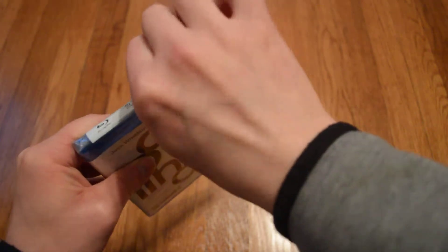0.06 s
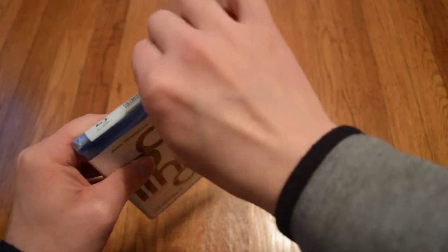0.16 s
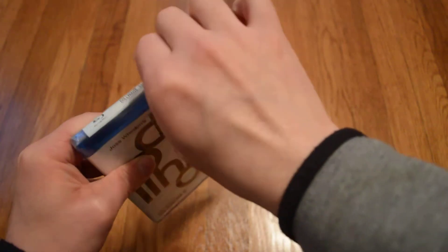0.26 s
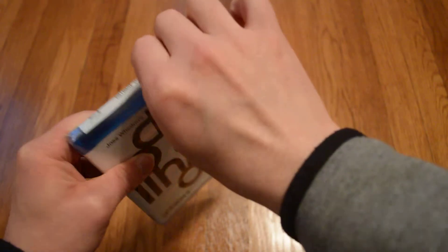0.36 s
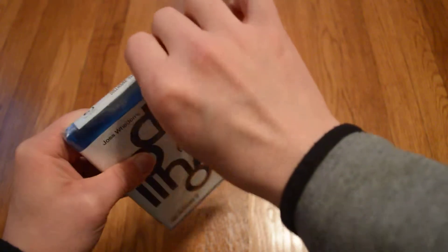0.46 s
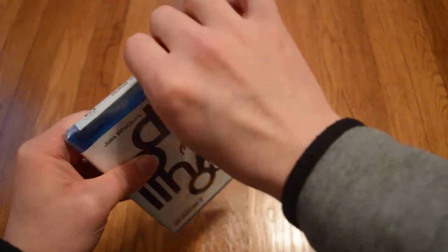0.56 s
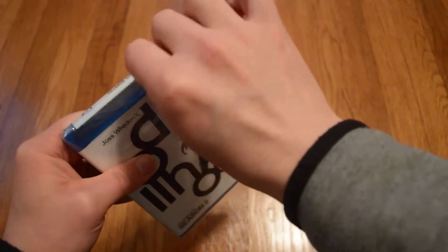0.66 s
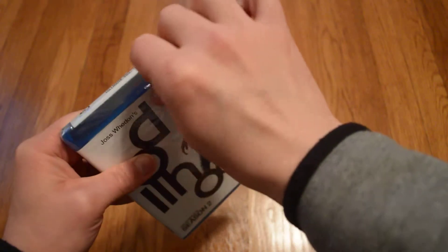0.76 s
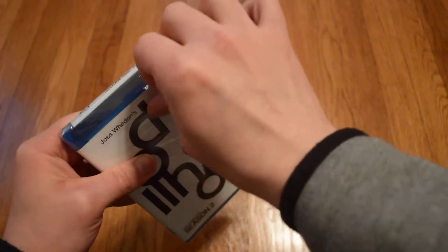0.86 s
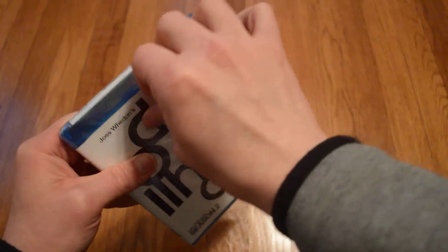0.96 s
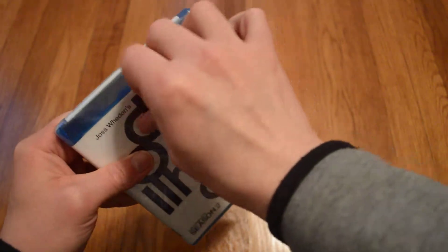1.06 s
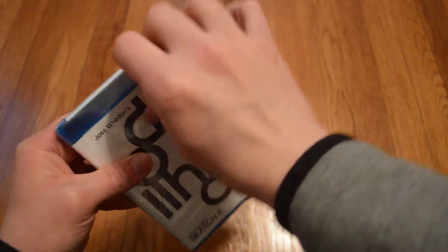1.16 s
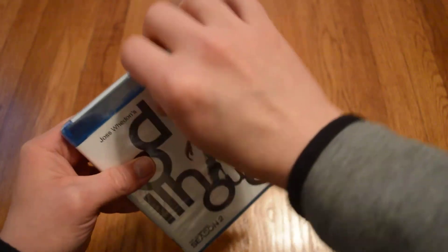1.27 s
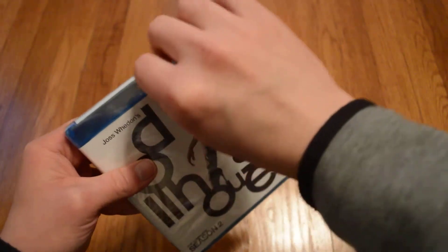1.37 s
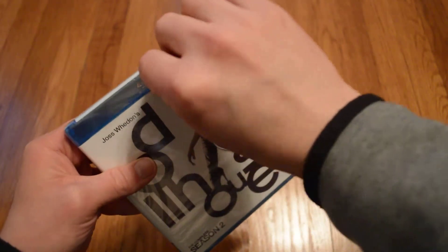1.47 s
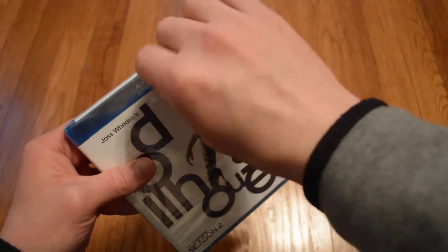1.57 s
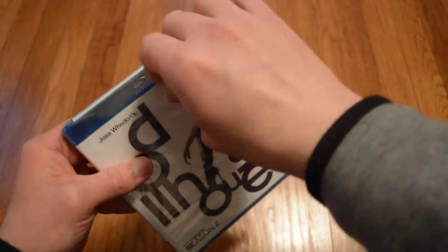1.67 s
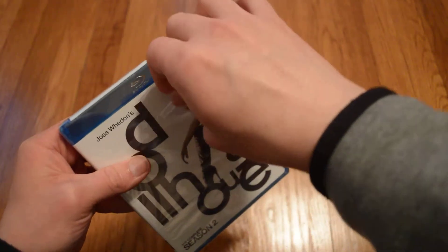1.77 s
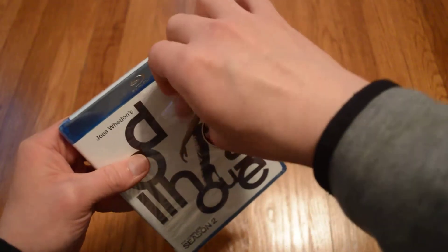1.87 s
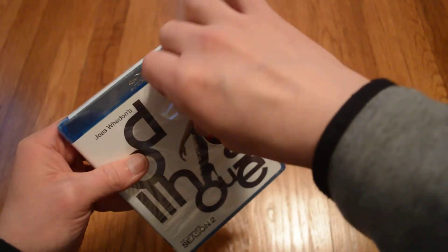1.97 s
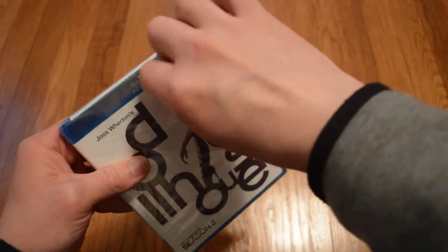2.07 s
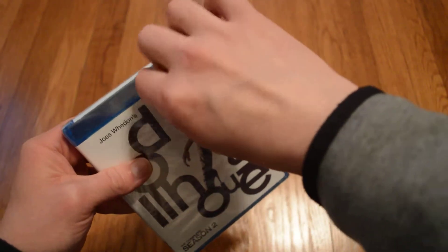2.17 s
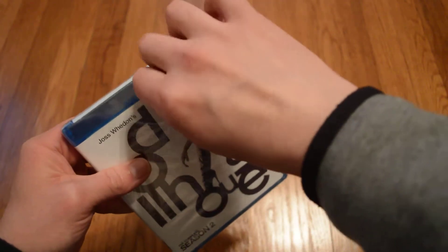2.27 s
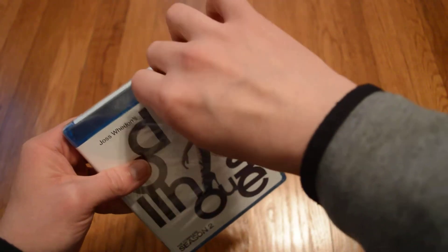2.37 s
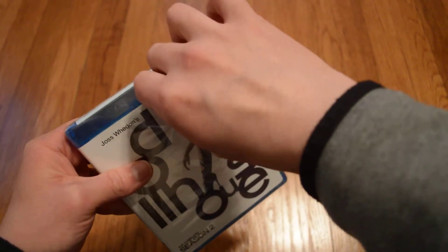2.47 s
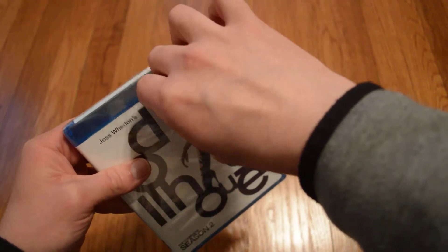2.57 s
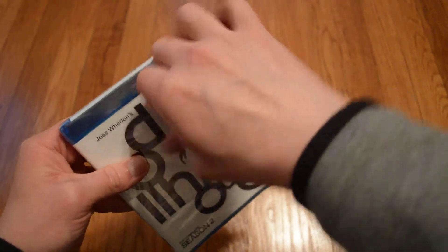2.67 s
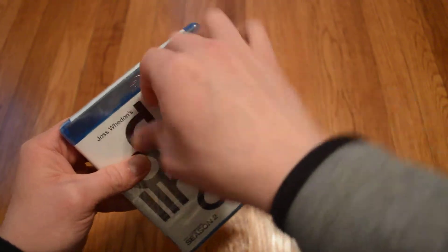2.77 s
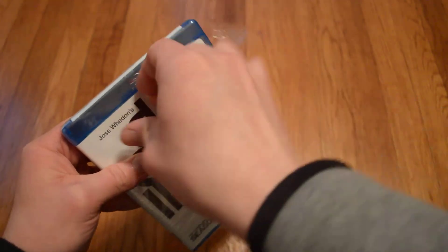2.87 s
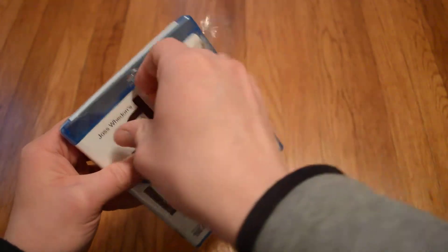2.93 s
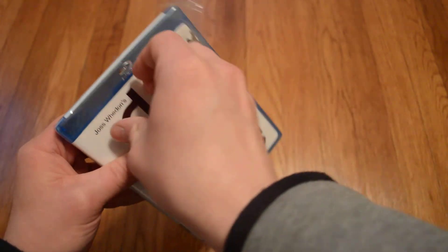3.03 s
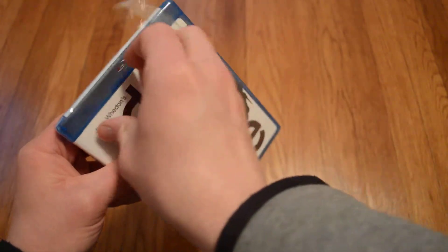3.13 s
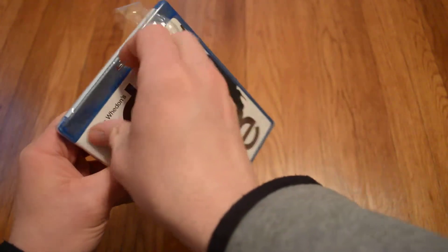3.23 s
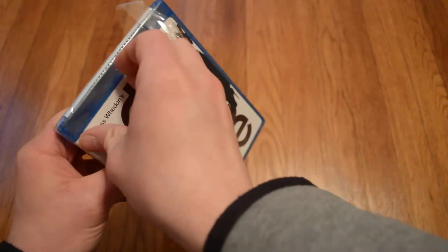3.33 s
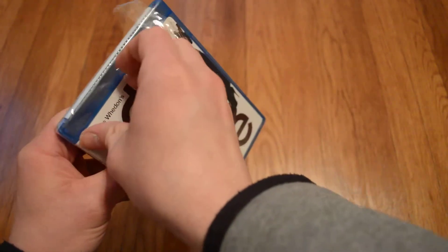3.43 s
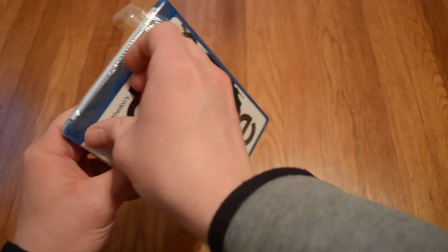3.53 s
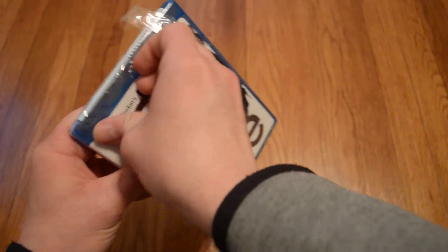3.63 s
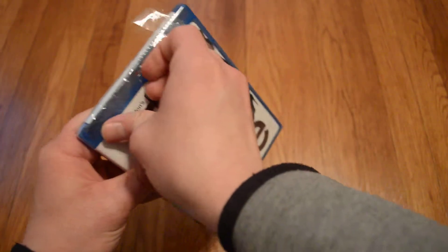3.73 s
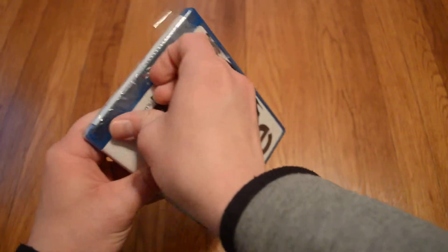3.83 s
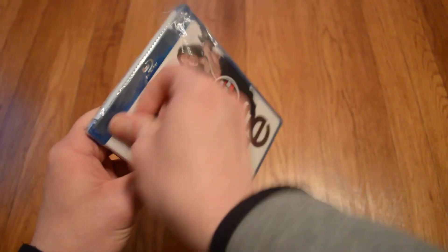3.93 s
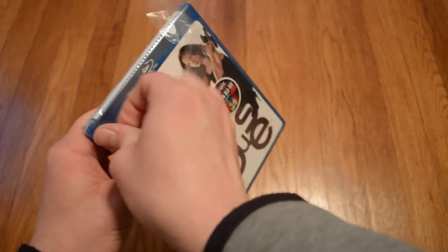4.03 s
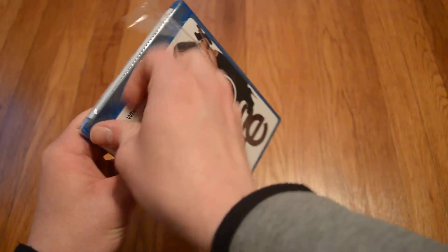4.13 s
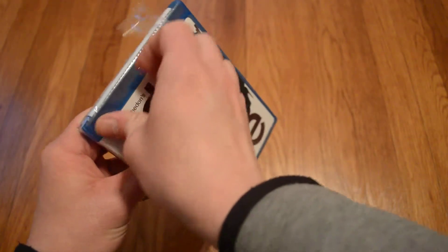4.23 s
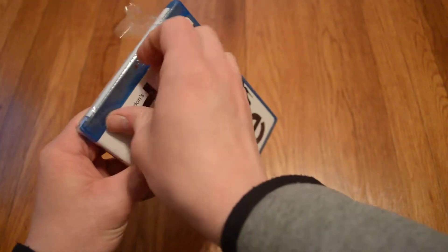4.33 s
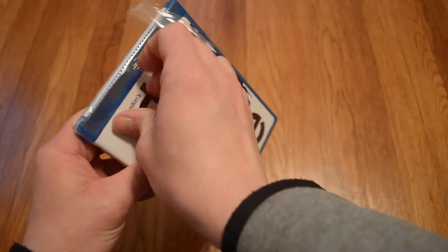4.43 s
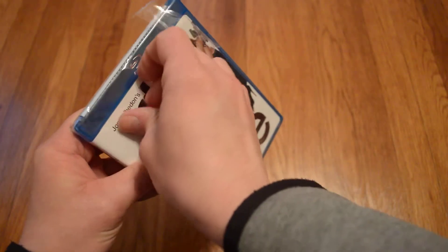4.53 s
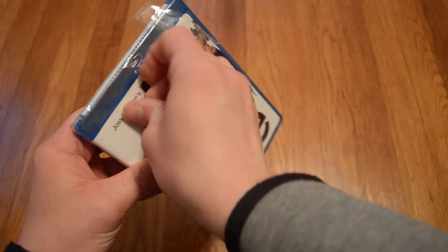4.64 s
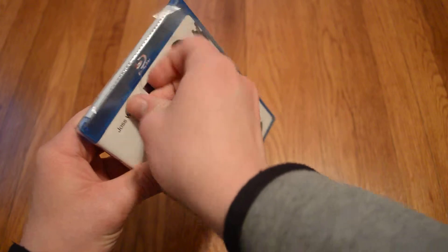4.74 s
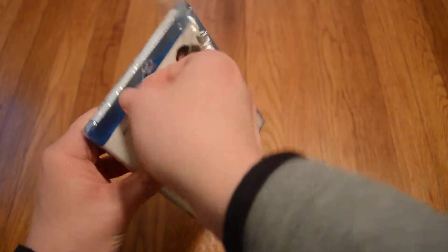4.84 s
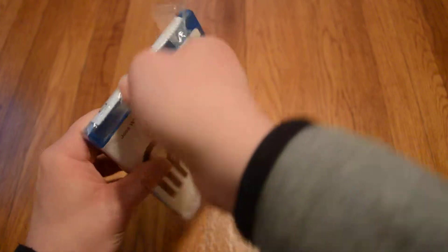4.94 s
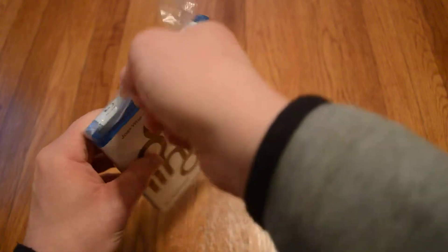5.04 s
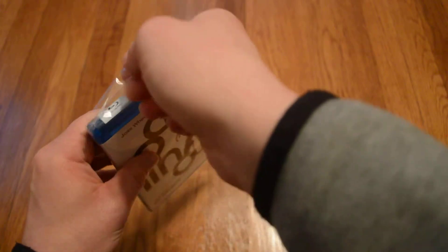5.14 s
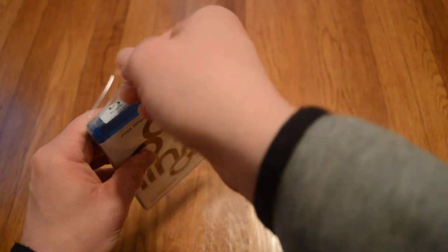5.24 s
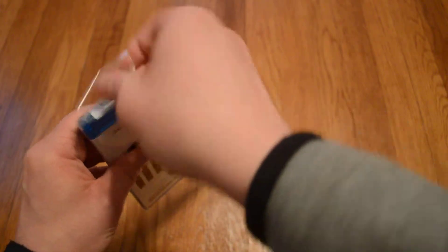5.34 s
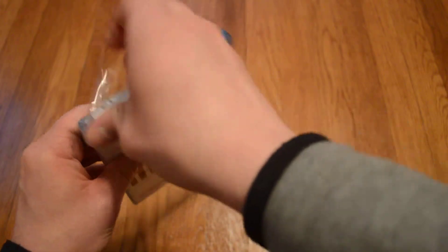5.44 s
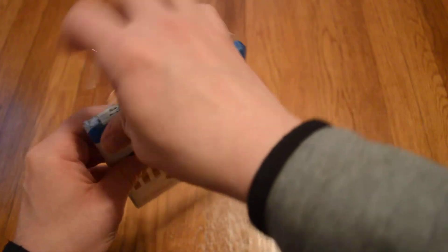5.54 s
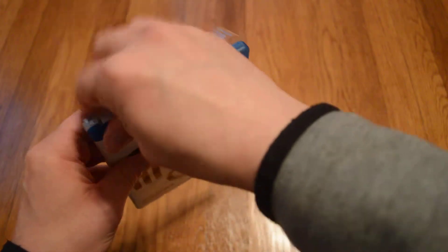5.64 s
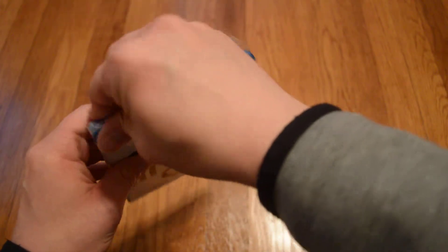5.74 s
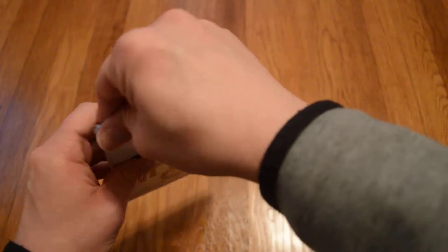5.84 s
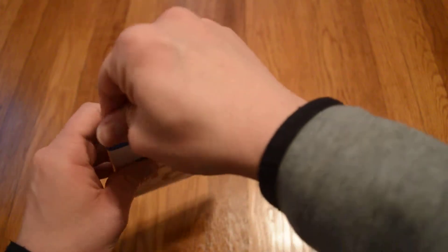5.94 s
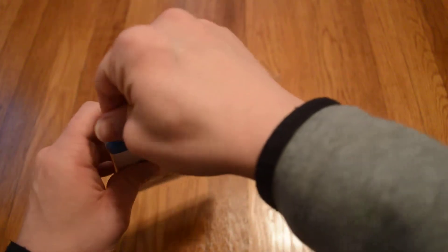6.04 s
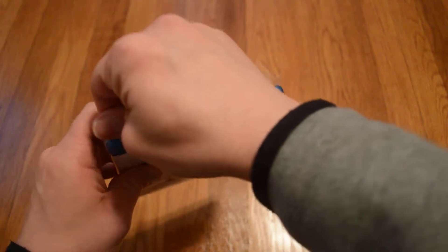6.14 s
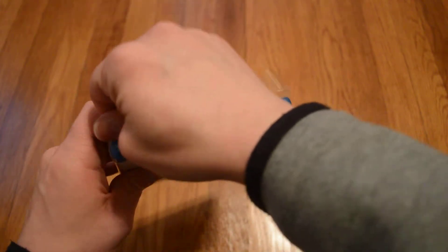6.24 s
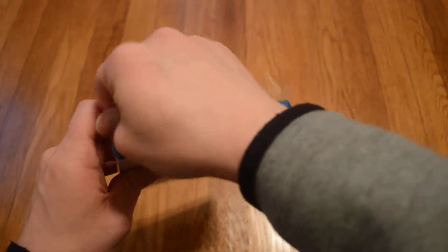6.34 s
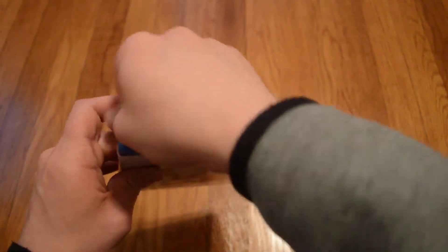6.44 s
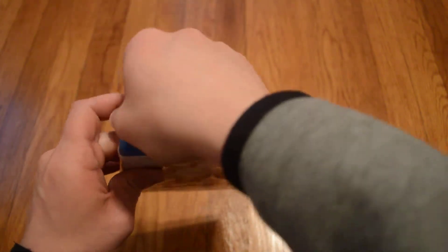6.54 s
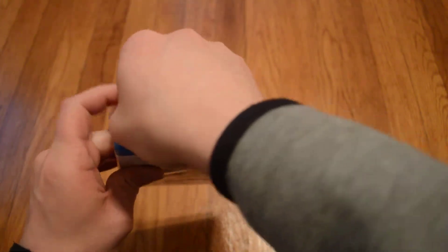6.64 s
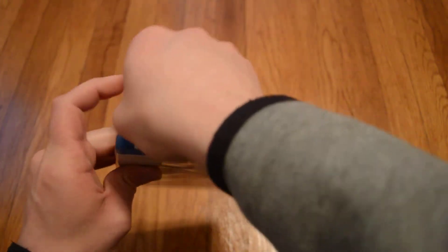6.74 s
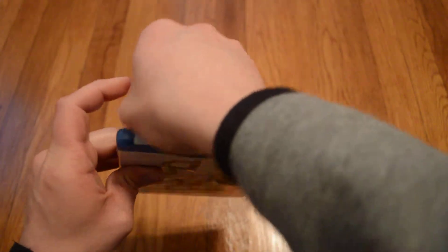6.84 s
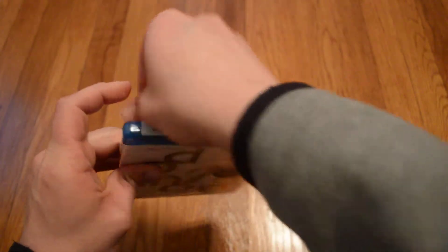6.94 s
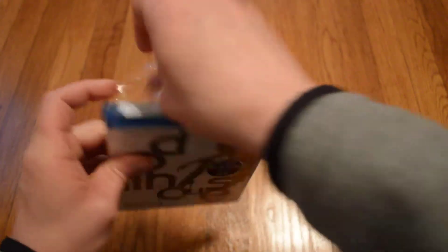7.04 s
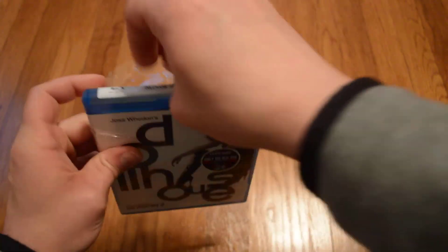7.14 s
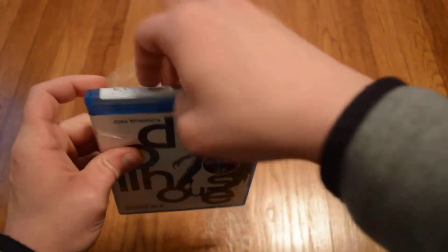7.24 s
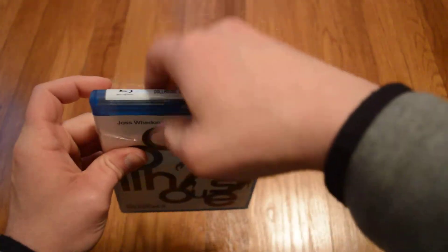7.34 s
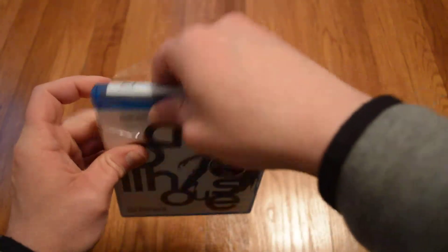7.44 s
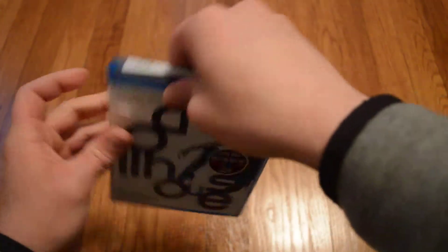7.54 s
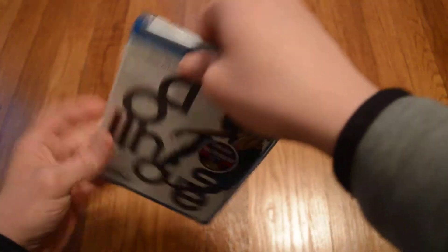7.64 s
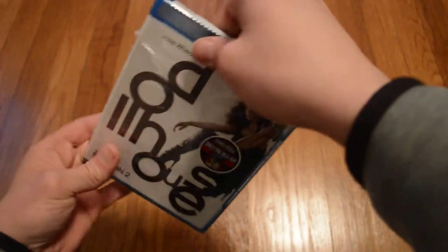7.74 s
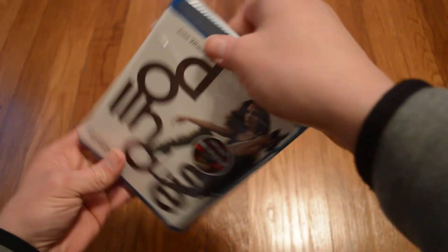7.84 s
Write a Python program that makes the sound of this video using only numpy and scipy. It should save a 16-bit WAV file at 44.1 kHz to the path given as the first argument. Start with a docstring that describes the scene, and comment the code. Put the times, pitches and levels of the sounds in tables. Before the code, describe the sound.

Plastic shrink-wrap is picked, crinkled and torn off a hollow plastic case in irregular close bursts, with one loud crack, over steady fan hum.

```python
"""Shrink-wrap on a plastic disc case, picked at and torn off by two hands close to a camera in a small room.
Film: swarms of tiny creases over rubbing noise, plus larger snaps, each a click with a random shiver. Case:
blows ring its hollow panel modes; once the wrap bursts with a loud crack. Fan: steady shaped noise, wavering
resonances and hum. Filtered noise forms the room's reflections. The loudest peaks overload the microphone and
clip; low thuds sound under the crack and a later hard snap."""
import sys
import numpy as np
from scipy import signal
from scipy.fft import rfft, irfft
from scipy.io import wavfile
from scipy.ndimage import uniform_filter1d

SR = 44100
rng = np.random.default_rng(int(sys.argv[2]) if len(sys.argv) > 2 else 0)


def to_wav(s):
    """Save 16-bit WAV."""
    ch = np.atleast_2d(s).T  # columns
    pcm = np.round(np.clip(ch, -1, 1) * 32767)  # PCM
    wavfile.write(sys.argv[1], SR, pcm.astype(np.int16))


N = 348390
SIZE = 2048  # samples in one short sound
HZ = np.fft.rfftfreq(SIZE, 1 / SR)
TIME_S = np.arange(N) / SR

# picks and pulls of the fingers, levels before trim: start_s, length_s, fine_crinkle_db, dull_rustle_db
PULLS = [(0.0, .06, -56.5, -39), (0.057, 0.078, -40, -47), (0.226, 0.021, -42, -48),
         (0.296, 0.087, -44, -49), (0.561, .13, -48, -50.5), (0.741, .14, -52, -52.5),
         (0.909, 0.042, -38, -49.5), (1.1, 0.053, -39.5, -46), (1.374, .05, -37, -44),
         (1.479, 0.067, -47, -50.5), (1.845, 0.082, -50, -50), (2.56, 0.063, -50.5, -46),
         (2.658, 0.079, -44.5, -42), (3.017, 0.068, -45.5, -50), (3.524, 0.032, -41.5, -46),
         (3.679, 0.31, -43, -53), (4.432, 0.072, -44, -46), (4.689, 0.18, -48, -53),
         (4.864, .13, -34.5, -41), (5.03, 0.065, -27, -28.5), (5.138, .17, -37, -36),
         (5.347, 0.078, -32, -38.5), (5.498, 0.019, -24, -33.5), (5.595, .14, -39, -41),
         (5.808, 0.12, -43.5, -43), (5.967, 0.032, -36.5, -40.5), (6.173, .16, -43, -46),
         (6.348, 0.043, -38, -39.5), (6.432, .05, -38.5, -38), (6.488, 0.048, -42.5, -38.5),
         (6.59, 0.18, -41.5, -43.5), (6.921, 0.034, -22.5, -30.5), (6.978, 0.052, -35.5, -35.5),
         (7.175, 0.076, -47.5, -59), (7.278, 0.046, -35, -39), (7.337, 0.044, -38, -33),
         (7.45, .12, -54, -47.5), (7.678, .11, -42, -48.5)]
# relative spectrum of free film crinkling: freq_hz, level_db
CRINKLE_COLOUR = [(100, -30), (1000, -21), (3000, -13), (5500, -4), (8000, -1), (13000, 0), (16000, -3)]
# relative spectrum of film dragged over the case: freq_hz, level_db
RUSTLE_COLOUR = [(60, -32), (300, -1), (550, -4), (900, 1), (2500, 0.5), (4500, -2), (7000, -12),
                 (16000, -30)]
# relative spectrum of room and fan air: freq_hz, level_db
AIR_COLOUR = [(20, -19), (38, -24), (58, -9), (90, -14), (170, -10.5), (280, -13.5), (400, -9),
              (750, -17.5), (1100, -13.5), (1600, -21.5), (2500, -25), (5500, -24.5), (9000, -29),
              (16000, -30.5)]
# fan resonances, levels before waver: centre_hz, width_hz, level_db
FAN_MODES = [(206, 24, -66.5), (1002, 63, -58.5), (1188, 124, -53.5), (1288, 124, -48), (15750, 60, -77.5)]
# motor and mains hum: freq_hz, level_db
HUM = [(60, -75), (120, -68), (171, -67.5), (208, -55), (240, -61.5)]
# loudest buckles of the film: start_s, level_db (at 5600 Hz), body_db (near 3 kHz, relative)
SNAPS = [(0.057, -5.5, -27), (0.079, -3.5, -3), (0.304, -9, -1), (0.3317, -10, -13), (0.56, -8.5, -5),
         (0.5933, -10, 0), (0.8113, -11, 2.5), (0.859, -8.5, -3), (1.041, -11, -15), (1.094, 0, -4),
         (1.1483, 3, -1.5), (1.3786, -11.5, 7.5), (1.42, -10, -15), (1.4894, -8.5, -2), (1.8509, -7, 2.5),
         (1.9183, -6, -10), (2.5061, 1.5, -9.5), (3.2546, -11.5, -12), (3.2988, -8, -12),
         (3.5324, 9.5, -10), (3.7101, 2.5, -17), (3.7304, 3, -36), (3.804, 3.5, -15), (3.8782, 17, -13),
         (4.39, -12, -2), (4.4426, 0, -3), (4.446, 2.5, -7), (4.474, -1.5, -8.5), (4.5084, -6, -28),
         (4.5274, -5.5, -30), (4.7714, -8.5, -5), (4.8208, -6, -6.5), (4.867, -0.5, 0), (4.9192, 1.5, -7),
         (4.9291, 1.5, 2), (4.99, -9, 6), (5.001, 10.5, -4), (5.0278, 3.5, 2.5), (5.0646, 8, -17),
         (5.068, 2, -20), (5.1662, -0.5, -13), (5.19, -1.5, -14), (5.2133, -1, -15), (5.2572, 0, -7),
         (5.3824, 4.5, -14), (5.422, -1.5, 0), (5.493, 6, -10), (5.524, 3.5, -8), (5.6663, -4, 8),
         (5.6916, -0.5, -8), (5.731, 5.5, -15), (5.8124, 7.5, -9), (5.8577, -7, -7), (5.9394, -5, -16),
         (5.9737, -3, -11), (6.1696, -7.5, -1), (6.2476, 7.5, -13.5), (6.3403, 8, -9.5), (6.389, -3, 1),
         (6.4236, 4, -17), (6.4651, 4, -10), (6.4793, -4, -6), (6.5268, -6.5, 5.5), (6.6706, -0.5, 1),
         (6.7145, -1, 2), (6.7634, -3.5, -2), (6.953, 7, -8), (7.0182, -1, -3), (7.282, 1, -13),
         (7.4809, -9.5, -4), (7.704, -11, -23)]
# blows on the case: start_s, level_db, ring_hz, contact_tick_db, thump_db (last two relative to level_db)
KNOCKS = [(0.0795, 10, 955, -30, -20), (0.308, 4.5, 1290, -15, -3), (1.552, 3, 990, -19, -2),
          (1.6814, 2.5, 970, -21, -2), (1.866, -0.5, 945, -6, 6), (2.02, -2.5, 1400, -8.5, -16),
          (2.1883, 10, 899, -25, -13), (2.301, -6, 1510, -5, -14), (2.572, 0.5, 1708, -2.5, -15),
          (3.533, 4.5, 1090, -28, -13), (4.99, 14, 2340, -7, -42), (5.002, 8.5, 2715, -15, -26),
          (5.0293, 9.5, 2490, -10, -15), (5.075, 9.5, 720, -20, -9), (5.213, 8.5, 1000, -3, -15),
          (5.291, 6.5, 779, -5, -3), (5.526, -2.5, 998, 1, 8.5), (5.616, 7.5, 805, -8.5, -21),
          (5.6667, 3, 900, -9, -20), (5.808, 3, 840, -5, -6), (6.425, 8, 1800, 4.5, -2.5),
          (6.528, 5.5, 1787, -9, -19), (6.619, 8.5, 1870, -18, -34), (6.714, 28.5, 1493, -44, -34),
          (6.723, 25, 1600, -19, -23), (6.9247, 20.5, 686, -16, -8.5), (6.962, 15, 1018, -18, -5.5),
          (7.2819, 13, 1110, -30, -8.5), (7.335, 8.5, 1020, 0, 2), (7.3376, 19.5, 1060, -7, -5)]
# damped panel modes of the case: centre_hz, q, level_db
CASE_MODES = [(710, 3.3, -6.5), (982, 4.4, 1), (1330, 3.3, -2), (1710, 5.9, 2), (2410, 1.9, -5.5),
              (3070, 5.6, -1)]
# relative spectrum of the burst's crack: freq_hz, level_db
BURST_COLOUR = [(30, -4), (120, -6.5), (500, -6.5), (830, 1.5), (1100, -3), (1450, 2.5), (2200, -4.5),
                (4500, -6), (6300, -3), (9000, -3.5), (12500, -2.5), (16000, -7)]
# low thuds under the crack and a later hard snap: start_s, level_db
THUDS = [(3.8817, 12), (6.424, 4)]
# reverberation time by band: freq_hz, t60_s
ROOM_T60 = [(150, 0.46), (600, 0.44), (2000, 0.5), (6000, 0.47), (11000, 0.36), (16000, 0.3)]
# relative initial spectrum of the reflections: freq_hz, level_db
ROOM_COLOUR = [(60, -26), (300, 1.5), (1500, 0.5), (5000, 0.5), (10000, 1.5), (16000, 0)]

ATTACK_S, SAG_DB_PER_S, RELEASE_DB_PER_S = 0.01, 12, 330  # release adds to sag
HOLDING_FINE_DB, HOLDING_DULL_DB = -61, -59.5  # hands never quite still; before trim
AIR_DB = -51
SHEEN_DB, SHEEN_PER_DB = 5.5, 0.08  # at 12 kHz: weaker snaps come from smaller, brighter facets
BURST_S, BURST_DB = 3.8806, 30
EDGE_HZ = 16300


def amp(db):
    """Decibels to gain."""
    return 10 ** (np.asarray(db) / 20)


def evened(x):
    """Scales to rms 1."""
    return x / np.sqrt(np.mean(x ** 2) + 1e-20)


def read(points, hz):
    """Interpolates a spectrum on a log-frequency axis."""
    point_hz, value = np.transpose(points)
    return np.interp(np.log(hz + 1), np.log(point_hz + 1), value)


def add(mix, start_s, sound):
    """Mixes a sound in at start_s, cut at the end of the mix."""
    part = mix[round(start_s * SR):][:len(sound)]
    part += sound[:len(part)]


def causal(gain):
    """Minimum-phase click: the sharpest onset with this spectrum."""
    both_sides = np.r_[gain, gain[-2:0:-1]]
    log_gain = np.log(np.maximum(both_sides, 1e-5))
    return np.fft.ifft(np.exp(np.conj(signal.hilbert(log_gain)))).real


def mode(hz, centre_hz, q):
    """Gain of one resonance, about 1 at its centre."""
    return 1 / np.sqrt(1 + (q * (hz / centre_hz - centre_hz / (hz + 1))) ** 2)


def flutter(decay_s, spike, evenness=0.53):
    """A sudden slip and its short random shiver, spectrum partly flattened, energy 1."""
    shiver = rng.standard_normal(SIZE) * np.exp(-np.arange(SIZE) / SR / decay_s)
    shiver /= np.linalg.norm(shiver)
    shiver[0] = spike
    power = uniform_filter1d(abs(rfft(shiver)) ** 2, size=60)
    shiver = signal.fftconvolve(shiver, causal(power ** (-evenness / 2)))[:SIZE]
    return shiver / np.linalg.norm(shiver)


def effort():
    """Fine and dull levels in dB: pulls grip quickly, ease a little, then let go; their powers add."""
    t = TIME_S[::32]
    holding_power = amp([HOLDING_FINE_DB, HOLDING_DULL_DB]) ** 2
    power = np.outer(holding_power, np.ones(len(t)))
    for start_s, length_s, fine_db, dull_db in PULLS:
        age_s = np.maximum(t - start_s, 0)
        fall_db = SAG_DB_PER_S * age_s + RELEASE_DB_PER_S * np.maximum(age_s - length_s, 0)
        grip = np.minimum(age_s / ATTACK_S, 1) * amp(-fall_db)
        power += np.outer(amp([fine_db, dull_db]), grip) ** 2
    return [np.interp(TIME_S, t, 10 * np.log10(p)) for p in power]


def crackle(effort_db, colour, mean_effort_per_s, spread_db, facet_db, rub,
            crowding=0.27, smoothing=0.14, count=16):
    """A swarm of tiny creases of unequal size, each with its own facet resonance, over a soft rub."""
    strain_db = effort_db - effort_db.mean()
    rate_per_s = mean_effort_per_s * amp(crowding * strain_db)  # harder work folds more creases
    size = amp(spread_db * np.minimum(rng.exponential(1, N), 3.6))
    size *= rng.random(N) < rate_per_s / SR
    # the hand feeds in strain evenly
    local_power = np.abs(uniform_filter1d(size ** 2, size=3000))
    size /= np.sqrt(local_power + 0.0087 * np.mean(size ** 2))

    facet = rng.integers(0, count, N)
    shape = amp(read(colour, HZ))
    creases = np.zeros(N)
    for k, facet_hz in enumerate(np.geomspace(900, 14000, count)):
        click = causal(shape * (1 + amp(facet_db) * mode(HZ, facet_hz, 1.7)))
        grain = signal.fftconvolve(click, flutter(0.00095, 0.75))[:SIZE]
        grain /= np.linalg.norm(grain)
        creases += signal.oaconvolve(size * (facet == k), grain)[:N]

    sliding = evened(signal.oaconvolve(rng.standard_normal(N), causal(shape))[:N])
    slide = rub * amp(-smoothing * strain_db)  # a light touch slides, a hard pull crackles
    return amp(effort_db) * (creases + slide * sliding) / np.hypot(1, slide)


def film(fine_trim_db=-1.5, dull_trim_db=-2, fine_wet_db=-8, dull_wet_db=-3):
    """Free film crinkles brightly at the microphone; film dragged over the case rustles lower, all around."""
    fine_db, dull_db = effort()
    fine = crackle(fine_db + fine_trim_db, CRINKLE_COLOUR,
                   mean_effort_per_s=290, spread_db=7.5, facet_db=7.0, rub=0.52)
    dull = crackle(dull_db + dull_trim_db, RUSTLE_COLOUR,
                   mean_effort_per_s=300, spread_db=5.0, facet_db=1.0, rub=0.33)
    return fine + dull, amp(fine_wet_db) * fine + amp(dull_wet_db) * dull


def fan(waver_db=2.5, waver_hz=22):
    """Steady air noise, narrow wavering fan resonances, and the hum of motor and mains."""
    hz = np.fft.rfftfreq(N, 1 / SR)

    def noise(gain):
        """White noise shaped by a spectrum, rms 1."""
        return evened(irfft(rfft(rng.standard_normal(N)) * gain, N))

    out = amp(AIR_DB) * noise(amp(read(AIR_COLOUR, hz)))
    for centre_hz, width_hz, level_db in FAN_MODES:
        waver = noise(mode(hz, waver_hz, 1) ** 2)
        band = noise(1 / (1 + ((hz - centre_hz) / width_hz * 2) ** 2))
        out += amp(level_db + waver_db * waver) * band
    for hum_hz, level_db in HUM:
        out += amp(level_db) * np.sqrt(2) * np.sin(2 * np.pi * (hum_hz * TIME_S + rng.random()))
    return out


def small_snaps(hard_pull_per_s=36, hard_pull_db=-36, size_db=-6.5, body_db=-10, scatter_db=3,
                growth=0.59, crowding=0.75, count=400):
    """Lesser buckles by chance, more often and louder up to a hard pull: rows like those of SNAPS."""
    strain_db = np.minimum(effort()[0] - hard_pull_db, 0)
    due = np.cumsum(hard_pull_per_s * amp(crowding * strain_db)) / SR  # expected count so far
    at = np.searchsorted(due, np.arange(count) + rng.random(count))
    scatter = scatter_db * rng.uniform(-1, 1, (count, 2))
    return [(i / SR, size_db + growth * strain_db[i] + a, body_db + 2 * b)
            for i, (a, b) in zip(at, scatter) if i < N]


def snaps(decay_s=0.00096, spike=0.71, wet_db=-11, beaming=0.35, low_db=-6, bass_db=-16):
    """Each buckle rings a facet of film; small bright facets beam at the microphone and stir the room less."""
    near, spread = np.zeros((2, N))
    for start_s, level_db, body_db in SNAPS + small_snaps():
        sheen_db = SHEEN_DB - SHEEN_PER_DB * level_db
        colour = [(100, body_db + bass_db), (1000, body_db + low_db), (3200, body_db), (5600, 0),
                  (8000, 0.012), (12000, sheen_db), (16000, sheen_db - 14)]
        click = causal(amp(level_db + read(colour, HZ)))
        add(near, start_s, signal.fftconvolve(click, flutter(decay_s, spike)))
        add(spread, start_s, click * amp(wet_db + beaming * min(body_db, 0)))
    return near, spread


def knocks(focus_q=3.64, thump_hz=310, thump_q=0.99, tick_hz=4700, bend_s=0.000933,
           wet_db=-9, wet_focus_q=1.0):
    """A blow rings panel modes near its pitch, with a low thump and a tick; the room hears a broader mix."""
    near, spread = np.zeros((2, N))
    panel = np.sqrt(sum((amp(db) * mode(HZ, hz, q)) ** 2 for hz, q, db in CASE_MODES))
    # low bending waves arrive last
    bending = np.exp(-2j * np.pi * bend_s * 2000 * np.arctan(HZ / 2000))
    for start_s, level_db, ring_hz, tick_db, thump_db in KNOCKS:
        thump = amp(thump_db) * mode(HZ, thump_hz, thump_q) ** 2
        near_click = causal(np.hypot(panel * mode(HZ, ring_hz, focus_q), thump))
        ring = irfft(rfft(near_click) * bending)
        contact = causal(mode(HZ, tick_hz, 0.83))
        tick = amp(tick_db) * signal.fftconvolve(contact, flutter(0.0013, 0.2))[:SIZE]
        add(near, start_s, amp(level_db) * (ring + tick))
        add(near, start_s + 0.00131, amp(level_db) * 0.19 * ring)  # the far panel answers
        wet_click = causal(np.hypot(panel * mode(HZ, ring_hz, wet_focus_q), thump))
        add(spread, start_s, amp(level_db + wet_db) * (wet_click + tick))
    return near, spread


def burst(decay_s=0.0011, wet_db=-12):
    """The taut wrap splits all at once and slaps the case: a shivering near crack, a plain click to the room."""
    near, spread = np.zeros((2, N))
    click = causal(amp(BURST_DB + read(BURST_COLOUR, HZ)))
    add(near, BURST_S, signal.fftconvolve(click, flutter(decay_s, 0.22, evenness=0.8)))
    add(spread, BURST_S, amp(wet_db) * click)
    return near, spread


def thuds(centre_hz=72):
    """Low thud under the crack and a later hard snap: one broad resonance each."""
    out = np.zeros(N)
    for start_s, level_db in THUDS:
        add(out, start_s, amp(level_db) * causal(mode(HZ, centre_hz, 0.96)))
    return out


def room(x, delay_s=0.0032, build_s=0.0012, grain_db=5):
    """Reflections arrive after a few milliseconds, in uneven clumps; each band dies at its own speed."""
    count = SR * 3 // 4
    clumps = evened(uniform_filter1d(rng.standard_normal(count), size=30))
    taps = rng.standard_normal(count) * amp(grain_db * np.tanh(clumps))
    hz, t, bands = signal.stft(taps, SR, nperseg=256)
    decay_db = 60 * t / read(ROOM_T60, hz)[:, None]
    bands = bands * amp(read(ROOM_COLOUR, hz)[:, None] - decay_db)
    tail = signal.istft(bands, SR, nperseg=256)[1][:count]
    tail *= 1 - np.exp(-np.maximum(TIME_S[:count] - delay_s, 0) / build_s)
    return signal.fftconvolve(x, tail / np.linalg.norm(tail))[:N]


def scene():
    """Handling noise, direct and through the room, with low thuds, over the fan."""
    near, spread = np.sum([film(), snaps(), knocks(), burst()], axis=0)
    return (near + room(spread) + thuds() + fan())[None]


def record(dry, low_cut_hz=28):
    """The loudest peaks clip; then the low cut and the band limit."""
    clipped = np.clip(dry, -1, 1)
    low_cut = signal.butter(2, low_cut_hz, "highpass", fs=SR, output="sos")
    thinned = signal.sosfilt(low_cut, clipped)
    band_limit = signal.firwin(255, EDGE_HZ, window=("kaiser", 7), fs=SR)
    return signal.oaconvolve(thinned, band_limit[None], "same")


dry = scene()
out = record(dry)
to_wav(out)
```